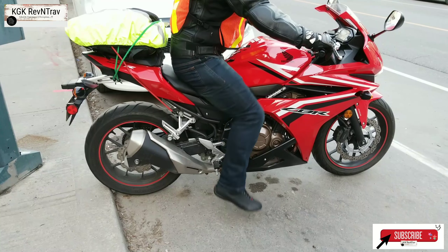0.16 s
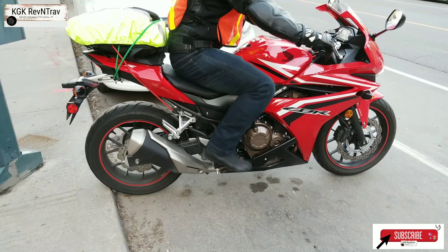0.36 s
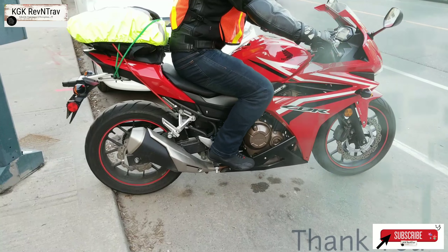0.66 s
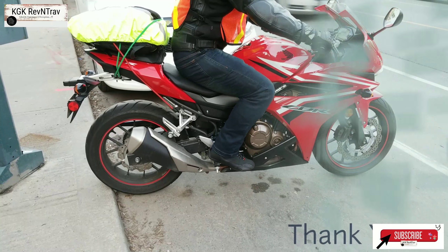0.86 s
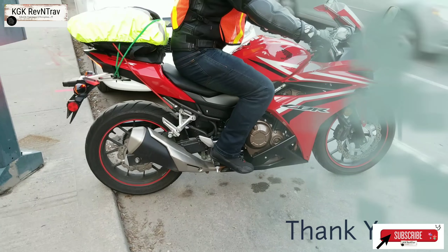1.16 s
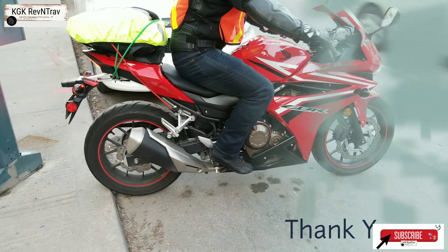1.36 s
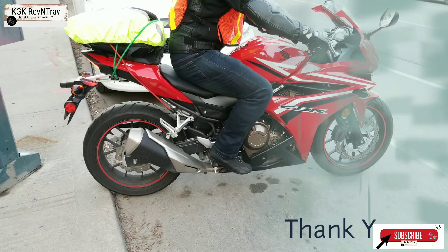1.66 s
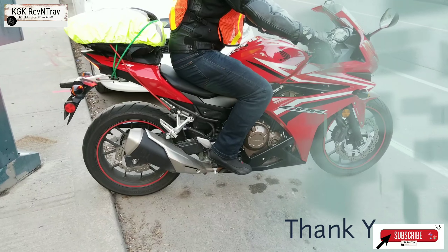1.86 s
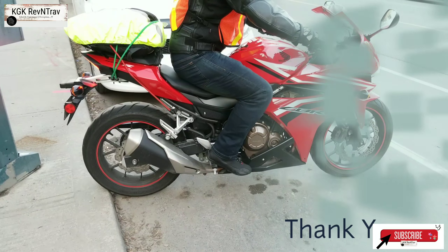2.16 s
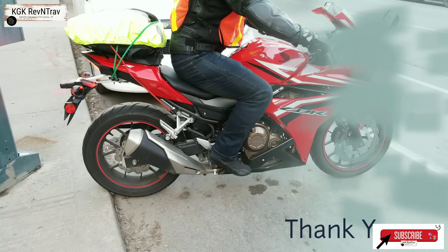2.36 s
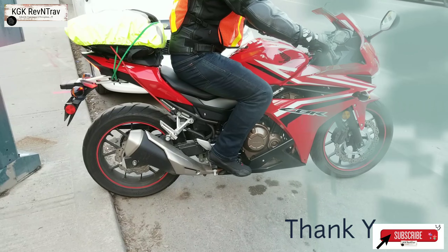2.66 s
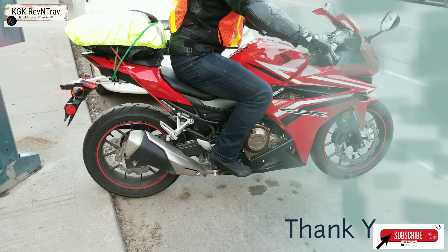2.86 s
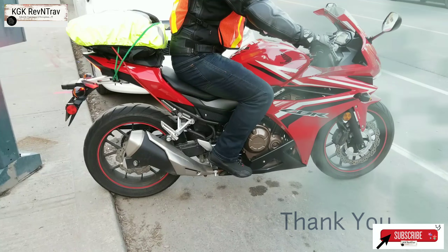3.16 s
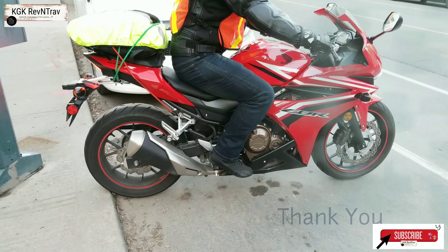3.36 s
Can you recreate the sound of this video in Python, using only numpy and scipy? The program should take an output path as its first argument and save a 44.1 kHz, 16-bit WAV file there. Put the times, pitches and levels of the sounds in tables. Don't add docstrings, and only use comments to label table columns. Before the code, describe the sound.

A parallel-twin motorcycle idles close by throughout, near 1300 rpm: two deep exhaust thumps, then a short gap, about eleven pairs a second, booming in the muffler, speed wavering slightly. Breathy intake and valve hiss pulses along. Behind, a car's tyre roar grows from 0.4 s; its hollow hum climbs, peaks near 1.5 s and drops away. Roar fades by 2.3 s, rising faintly again after 3 s, over low street rumble.

```python
import sys
import numpy as np
from scipy import signal
from scipy.io import wavfile
from scipy.ndimage import map_coordinates

SR = 44100
rng = np.random.default_rng(int(sys.argv[2]) if len(sys.argv) > 2 else 0)


def pcm_store(signal):
    levels = np.round(np.clip(np.atleast_2d(signal), -1, 1) * 32767)
    wavfile.write(sys.argv[1], SR, levels.astype(np.int16).T)


def volts_from_db(level):
    exponent = np.asarray(level, float) / 20
    return 10 ** exponent


N = 154350
LEFT_RIGHT = np.array([[1], [-1]])


def rms_one(x):
    return x / np.sqrt(np.mean(x ** 2) + 1e-20)


def in_time(rows, t):
    s, *columns = np.transpose(rows)
    return [np.interp(t, s, c) for c in columns]


def at_hz(points, hz):
    point_hz, value = np.array(points)[:, :2].T
    return np.interp(np.log(hz), np.log(point_hz), value)


def drift(rate_hz):
    r = np.exp(-2 * np.pi * rate_hz * 40 / SR)
    settle = 2000
    slow = signal.lfilter([1], [1, -2 * r, r * r], rng.standard_normal(N // 40 + 2 + settle))[settle:]
    return np.interp(np.arange(N) / 40, np.arange(len(slow)), rms_one(slow))


def lagged(x, lag_ms):
    i = np.arange(N)
    half = lag_ms * SR / 2000
    left = map_coordinates(x, [i - half], mode="mirror")
    right = map_coordinates(x, [i + half], mode="mirror")
    return np.array([left, right])


def bands(channels):
    white = rng.standard_normal((2, channels, N))
    edges = 25 * 2 ** np.arange(0, 9.5, 1 / 3)
    for k, (low, high) in enumerate(zip(edges, edges[1:])):
        sos = signal.butter(2, [low, high], "band", fs=SR, output="sos")
        yield np.sqrt(low * high), signal.sosfilt(sos, white[k % 2])


# time_s, speed_rpm
CRANK_SPEED = [(0.0, 1319.2), (0.258, 1330.6), (0.273, 1387.6), (0.699, 1358.7), (0.858, 1318.5),
               (0.86, 1295.0), (1.169, 1340.0), (1.468, 1359.7), (1.627, 1319.6), (1.845, 1307.6),
               (2.104, 1372.4), (2.319, 1322.6), (2.398, 1295.6), (2.567, 1351.2), (2.865, 1318.6),
               (3.102, 1312.5), (3.169, 1224.5), (3.5, 1328.2)]


def crank_rpm(lead):
    return in_time(CRANK_SPEED, np.arange(-lead, N) / SR)[0]


def cycles(lead):
    cycle_at_start = .7582
    turned = np.cumsum(crank_rpm(lead) / 120 / SR)
    return turned - turned[lead] + cycle_at_start


def valve_pulses(lead):
    second_after, open_for = .233, .323
    second_db, shut_db, exhaust_db = -1.1, -6.2, 0.5
    firing_spread_db, pulse_hz = .5, 200
    cycle = cycles(lead)
    pulses = np.full(N + lead, 1e-18)
    for after, db in ((0, 0), (second_after, second_db)):
        chance_db = rng.normal(0, firing_spread_db, (60, 2))
        for shut, gain in enumerate((1, -volts_from_db(shut_db))):
            at = np.flatnonzero(np.diff(np.floor(cycle - after - shut * open_for)))
            pulses[at] += gain * volts_from_db(exhaust_db + db + chance_db[:len(at), shut])
    soft = np.exp(-2 * np.pi * pulse_hz / SR)
    return signal.lfilter([(1 - soft) ** 2], [1, -2 * soft, soft ** 2], pulses)


# pitch_hz, level_db, t60_s, sign [+1 or -1]
MUFFLER_MODES = [
    (79.9, -11.5, .194, -1),
    (45.5, -20.0, .115, -1),
    (140.4, -24.5, .2, 1),
    (200, -35, .1, 1),
    (236, -36, .1, -1),
]


def exhaust():
    sharper_db_per_rpm, idle_rpm = .03, 1330
    mode_spread_db, pipe_cut_hz = 1.2, 84.4
    pan_db, lag_ms = 0.17, 0.069
    lead = SR // 2
    pulses = valve_pulses(lead)
    sharper_db = sharper_db_per_rpm * (crank_rpm(lead) - idle_rpm)
    out = 0
    for hz, db, t60, sign in MUFFLER_MODES:
        octaves_up = max(0, np.log2(hz / 75))
        chance_db = mode_spread_db * np.pad(drift(8), (lead, 0))
        struck = pulses * volts_from_db(octaves_up * (chance_db + sharper_db))
        r, w = volts_from_db(-60 / (t60 * SR)), 2 * np.pi * hz / SR
        ring = signal.lfilter([0, np.sin(w)], [1, -2 * r * np.cos(w), r * r], struck)
        out = out + sign * volts_from_db(db) * ring
    pipe = signal.butter(2, pipe_cut_hz, "high", fs=SR, output="sos")
    out = signal.sosfilt(pipe, out)[lead:]
    return lagged(out, lag_ms) * volts_from_db(pan_db * LEFT_RIGHT)


# top [share of cycle], width [share of cycle], level_db
HISS_SWELLS = [(.28, 0.049, 3), (0.27, 0.37, 4)]
# pitch_hz, share
SWELL_FOLLOWING = [(300, 0.59), (1200, 0.34), (4000, 0.77), (9000, 1.53), (15000, 1.15)]
# pitch_hz, level_db [per Hz]
ENGINE_SPECTRUM = [(200, 1.5), (300, -6.5), (450, -7.5), (780, -4.5), (1050, -13.5), (1500, -10),
                   (4500, -23), (15500, -31.5)]
# pitch_hz, likeness [-1..1]
CORRELATION = [(60, 1.0), (130, 1), (290, 0.97), (640, 0.42), (1410, 0.21), (3100, 0.003), (6820, -0.23),
               (15000, -0.11)]
# pitch_hz, level_db
LEFT_OVER_RIGHT = [(60, -17), (180, 0), (550, -2), (1650, 1), (4970, -1), (15000, 2)]


def engine_noise(patchy_db, uneven):
    level_db = -34
    cycle = cycles(0)
    swell_db = 0
    for top, width, db in HISS_SWELLS:
        from_top = (cycle - top + .5) % 1 - .5
        swell_db = swell_db + db * np.exp(-.5 * (from_top / width) ** 2)
    swell_db = (swell_db - swell_db.mean()) * (1 + uneven * drift(6)) + .5 * drift(40)
    out = 0
    for hz, (mid, side) in bands(channels=2):
        alike = at_hz(CORRELATION, hz)
        lean_db = at_hz(LEFT_OVER_RIGHT, hz) / 2
        bass_loss_db = 24 * max(0, np.log2(ENGINE_SPECTRUM[0][0] / hz))
        db = at_hz(ENGINE_SPECTRUM, hz) - bass_loss_db
        db = db + at_hz(SWELL_FOLLOWING, hz) * swell_db + patchy_db * drift(2.8)
        pair = np.sqrt(1 + alike) * mid + np.sqrt(1 - alike) * side * LEFT_RIGHT
        out = out + volts_from_db(db) * volts_from_db(lean_db * LEFT_RIGHT) * pair
    return volts_from_db(level_db) * rms_one(out)


# time_s, level_db, brightness [dB per octave], body boom [dB], left lag [ms]
PASSING_CAR = [(0, -42, -1.5, -3, 0.092), (.4, -38, 0.5, -3.5, 0.067), (.7, -33.5, -2, -8.5, 0.038),
               (1.05, -32, -0.5, -1, 0.217), (1.3, -30, .5, 1, 0.372), (1.47, -33, 1.5, 3, 0.43),
               (1.6, -32.5, 1, 2, 0.46), (1.85, -33.5, 1, -2, 0.49), (2.2, -40.5, 0, -10, 0.36),
               (2.9, -44, -2, -9, 0.4), (3.25, -41.5, -1, 2.5, 0.094), (3.5, -36, 0, -0.5, 0.072)]
# pitch_hz, level_db [per Hz]
TYRE_SPECTRUM = [(200, 3.5), (330, -7), (550, -0.5), (1000, -3), (1300, -4.5), (2500, -15.5), (5000, -24),
                 (15000, -33.5)]


def traffic(patchy_db):
    scattered, boom_below_hz = 0.39, 650
    level_db, tilt_db, boom_db, lag_ms = in_time(PASSING_CAR, np.arange(N) / SR)
    out = 0
    for hz, noise in bands(channels=3):
        bass_loss_db = 26 * max(0, np.log2(TYRE_SPECTRUM[0][0] / hz))
        db = at_hz(TYRE_SPECTRUM, hz) - bass_loss_db + tilt_db * np.log2(hz / 800)
        db = db + boom_db / (1 + (hz / boom_below_hz) ** 6) + patchy_db * drift(2.9)
        out = out + noise * volts_from_db(db)
    out = rms_one(out)
    direct = np.sqrt(1 - scattered) * lagged(out[0], lag_ms)
    return volts_from_db(level_db) * (direct + np.sqrt(scattered) * out[1:])


# time_s, pitch_hz, level_db
TYRE_HUM = [
    (0, 430, -59),
    (.6, 440, -50),
    (.75, 450, -41),
    (.95, 470, -49),
    (1.15, 520, -38),
    (1.35, 560, -37.5),
    (1.48, 600, -32),
    (1.6, 600, -56),
    (3.5, 600, -70),
]


def hum():
    width_hz = 46
    t = np.arange(N) / SR
    hz, db = in_time(TYRE_HUM, t)
    lag_ms = in_time(PASSING_CAR, t)[3]
    low_pass = signal.butter(2, width_hz, fs=SR, output="sos")
    a, b = signal.sosfilt(low_pass, rng.standard_normal((2, N)))
    phase = 2 * np.pi * np.cumsum(hz) / SR
    tone = rms_one(a * np.cos(phase) + b * np.sin(phase))
    return volts_from_db(db) * lagged(tone, lag_ms)


def rumble():
    level_db, low_hz, high_hz = -43.5, 35, 170
    sos = signal.butter(2, [low_hz, high_hz], "band", fs=SR, output="sos")
    mid, side = signal.sosfilt(sos, rng.standard_normal((2, N)))
    return volts_from_db(level_db) * rms_one(mid + 0.21 * side * LEFT_RIGHT)


def scene():
    motorcycle = exhaust() + engine_noise(patchy_db=0.28, uneven=0.37)
    car = traffic(patchy_db=1.55) + hum()
    return motorcycle + car + rumble()


def band_limit(x):
    return signal.sosfilt(signal.butter(12, 15940, fs=SR, output="sos"), x)


# pitch_hz, width_hz, level_db
MIC_COLOUR = [(8700, 840, -5), (9660, 1230, -3), (777, 150, 3.5), (4460, 390, 3.5), (712, 57, -11),
              (7770, 700, 2.5), (1060, 120, 2.5), (10600, 300, -0.5)]


def record(dry):
    top_hz = 15560
    for hz, width_hz, db in MIC_COLOUR:
        w, a = 2 * np.pi * hz / SR, volts_from_db(db / 2)
        q = np.tan(np.pi * width_hz / SR)
        zeros = [1 + q * a, -2 * np.cos(w), 1 - q * a]
        poles = [1 + q / a, -2 * np.cos(w), 1 - q / a]
        dry = signal.lfilter(zeros, poles, dry)
    mix = signal.sosfilt(signal.ellip(12, .3, 70, top_hz, fs=SR, output="sos"), dry)
    return band_limit(mix)


dry = scene()
out = record(dry)
pcm_store(out)
```